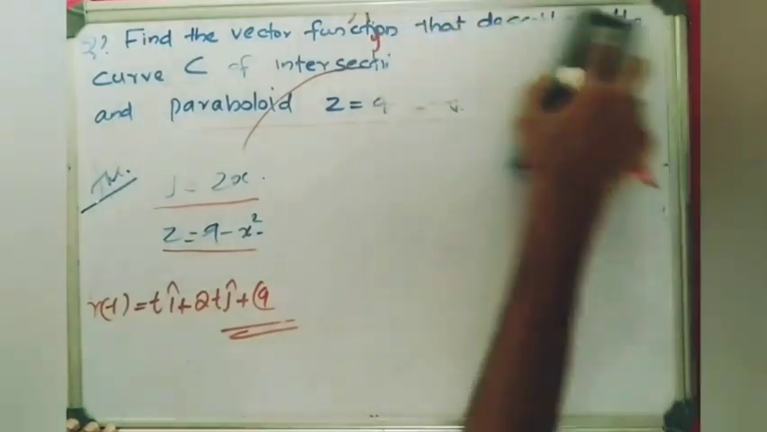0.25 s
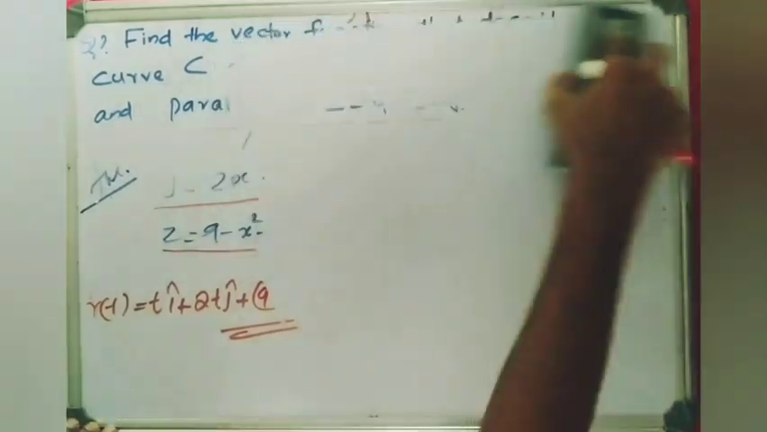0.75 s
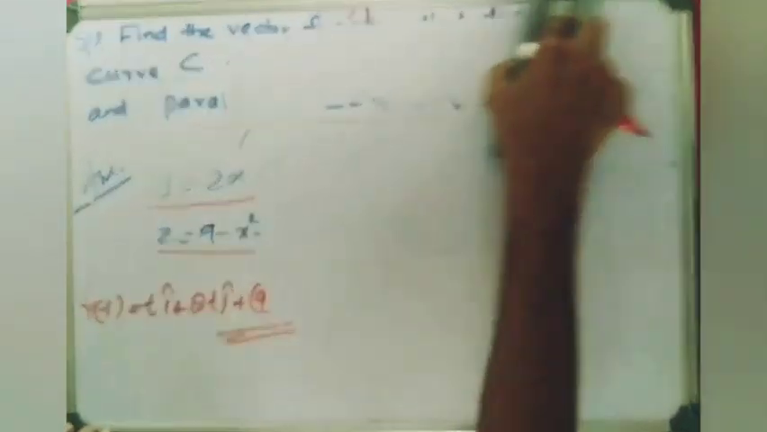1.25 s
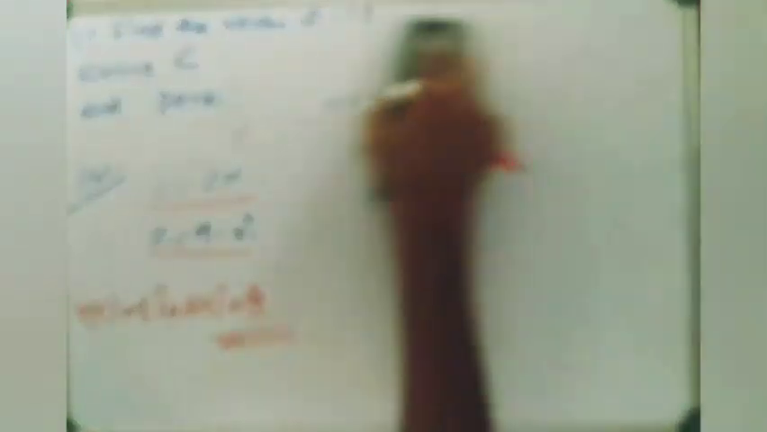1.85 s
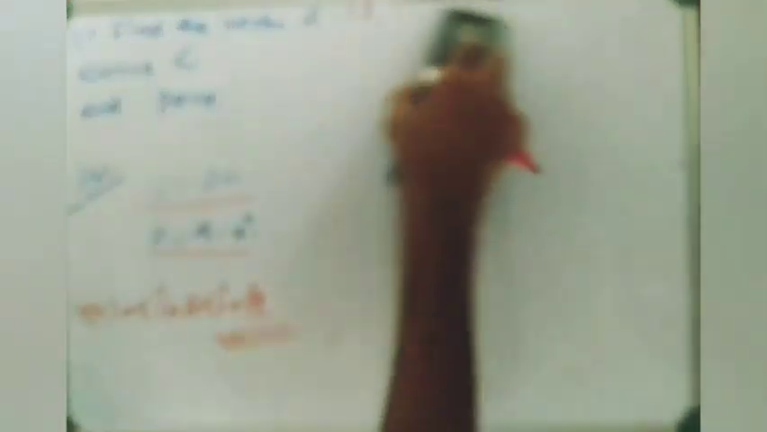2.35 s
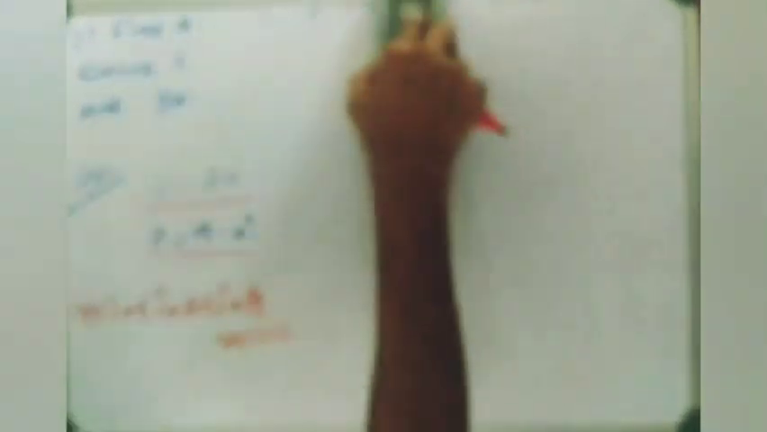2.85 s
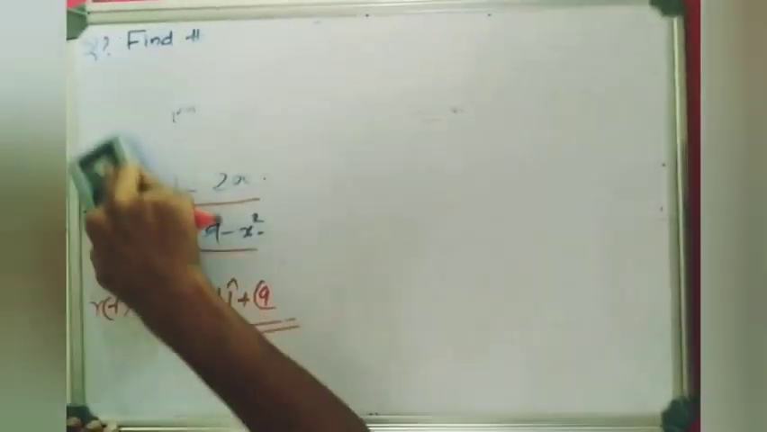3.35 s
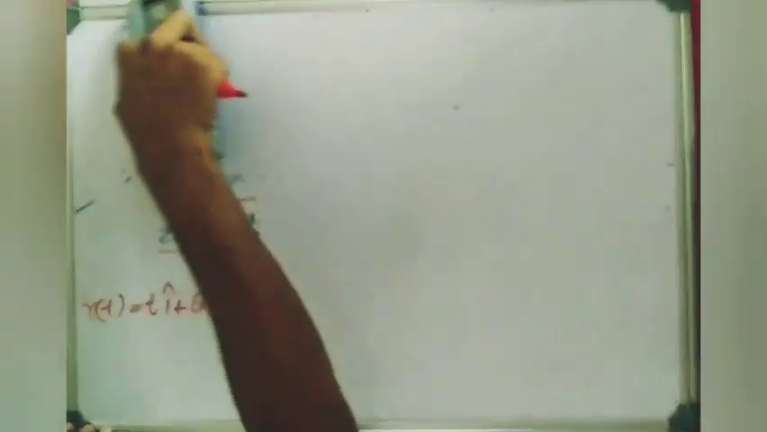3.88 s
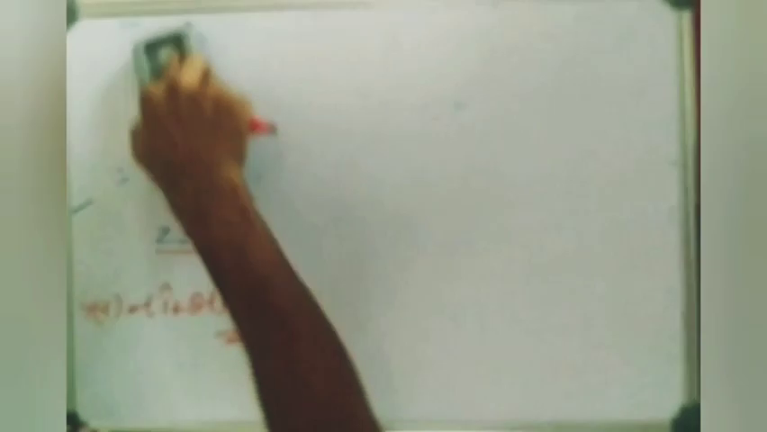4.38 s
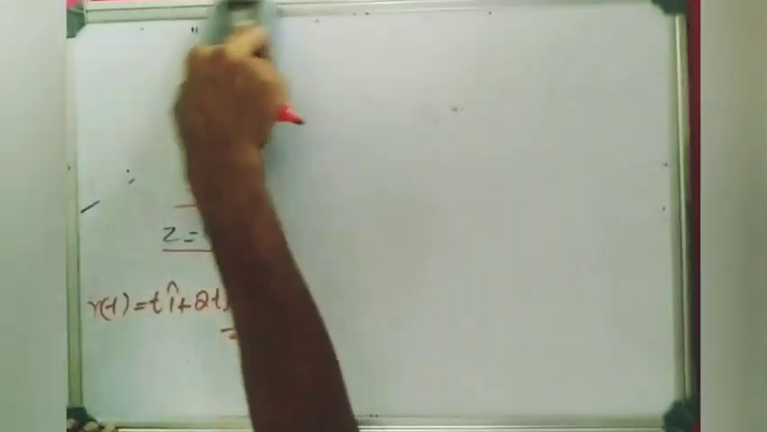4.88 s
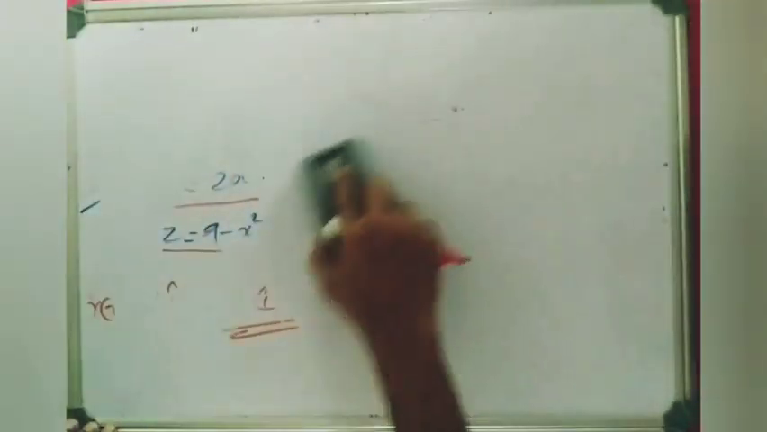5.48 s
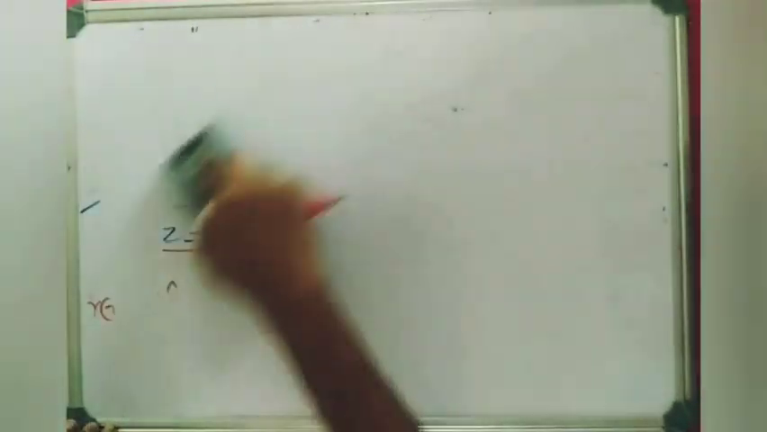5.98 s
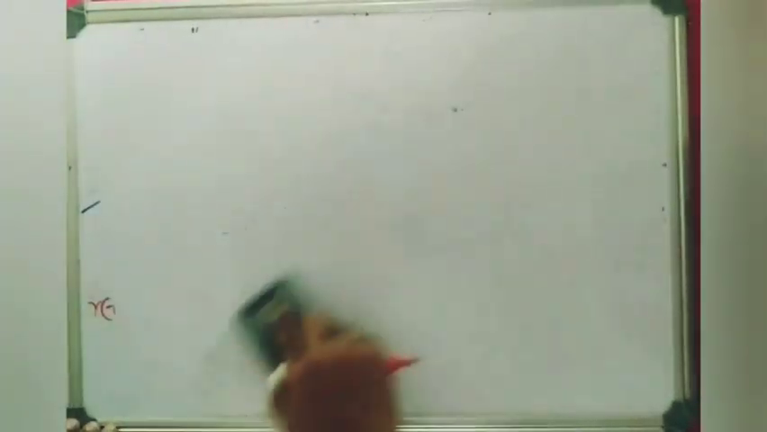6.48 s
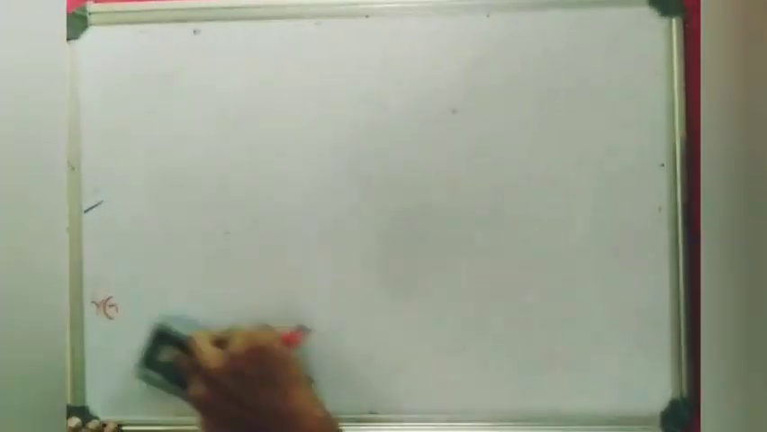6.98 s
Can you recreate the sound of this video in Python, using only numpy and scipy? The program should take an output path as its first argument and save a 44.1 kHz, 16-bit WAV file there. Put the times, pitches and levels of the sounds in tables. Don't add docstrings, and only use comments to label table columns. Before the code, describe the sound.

Soft, dry, breathy rubbing of felt on enamel, dipping at every change of direction. Behind it are a low engine drone sinking in pitch, dull street rumble through the walls, faint hiss and a very high sliding whine. Early knocks are sparse and faint; later strokes hit the panel with hollow thumps, gritty edge catches, small groans and two brief scrapes by the hard back. Close microphone, quiet small room.

```python
import sys
import numpy as np
from scipy import signal
from scipy.io import wavfile
from scipy.ndimage import uniform_filter1d

SR = 44100
rng = np.random.default_rng(int(sys.argv[2]) if len(sys.argv) > 2 else 0)


def makeup_ratio(level_db):
    decades = np.asarray(level_db, float) / 20
    return 10 ** decades


def put_to_file(sound):
    columns = np.atleast_2d(sound).T
    safe = np.clip(columns, -1, 1)
    whole_steps = np.round(safe * 32767)
    wavfile.write(sys.argv[1], SR, whole_steps.astype(np.int16))


N = 318828

# turn_s, turn_level_db, full_speed_level_db, full_speed_at_share (0-1 of the stroke)
STROKES = [(-.05, -59, -54.5, 0.4), (.22, -59, -51.5, 0.74), (.54, -59.5, -54.5, 0.41),
           (.91, -60.5, -53.5, 0.25), (1.051, -63, -53.5, 0.42), (1.185, -61, -54, 0.37),
           (1.51, -58.5, -55, 0.5), (1.73, -61, -53.5, 0.5), (2.09, -59.5, -56, 0.43),
           (2.33, -62, -52.5, 0.75), (2.68, -63, -53, 0.48), (2.92, -60, -53, 0.72), (3.25, -60.5, -55, 0),
           (3.46, -62, -57.5, 0.46), (3.721, -65.5, -54, 0.56), (3.85, -55, -55, 0.83),
           (4.13, -61.5, -57, 0.46), (4.31, -62.5, -54.5, 0.8), (4.61, -66.5, -52, 0.56),
           (4.851, -63, -54.5, .5), (5.04, -58.5, -54.5, 0.95), (5.25, -63.5, -52, 0.41),
           (5.46, -61, -53.5, 0.5), (5.7, -61, -53.5, 0.57), (5.94, -59, -52.5, 0.43), (6.2, -59, -55, 0.7),
           (6.439, -59.5, -54.5, 0.44), (6.82, -61, -55.5, 0.4), (7.05, -59.5, -56.5, 0.7)]
# pitch_hz, density_db (per Hz)
FELT_COLOUR = [(590, -44), (1000, -30), (1470, -8.5), (1570, -18), (1900, -6), (2930, -2.5), (3490, -3.5),
               (9000, -3), (11700, -7), (19800, -120)]
# time_s, brightness_db
PAD_TILT = [
    (0, -8),
    (.7, -3),
    (1.6, -3),
    (2.4, -3.5),
    (3.1, -3.5),
    (3.9, -1),
    (4.7, -0.5),
    (5.6, -5),
    (7.23, -0.5),
]

# time_s, speed_hz (cycles per second)
ENGINE_SPEED = [(0.0, 24.62), (0.7, 24.67), (1.4, 24.6), (1.9, 24.1), (2.2, 23.74), (2.8, 23.58),
                (3.4, 22.86), (4.0, 22.13), (4.6, 21.46), (5.2, 20.75), (5.8, 20.05), (6.4, 19.65),
                (7.23, 19.47)]
# time_s, load (0-1)
ENGINE_LOAD = [
    (0, 0.92),
    (1.2, 0.78),
    (1.4, 0.97),
    (1.88, 0.94),
    (2.05, 0.32),
    (5.6, 0.4),
    (5.9, 0.58),
    (7.23, 0.1),
]
# time_s, level_db
EXHAUST = [(0, -0.5), (.45, 5), (.7, -1), (.9, 4), (1.55, 0.5), (1.95, -0.5), (2.15, 8.5), (2.66, 7.5),
           (2.73, 1), (3.55, 3.5), (3.75, 6.5), (4.25, 9.5), (4.7, 3), (5.3, 5), (5.9, 2), (6.42, 4),
           (6.56, -11), (7.23, -11)]
# order (count), coasting_db, loaded_db, exhaust_share (of the exhaust level followed)
LOW_ORDERS = [(3, -42.5, -81, 0.67), (4, -55.5, -54.5, 1.44), (5, -54.5, -63.5, 0.68),
              (6, -61.5, -57.5, 0.3)]
# order (count), level_db, full_load_extra_db
UPPER_ORDERS = [(7, -64, 1), (8, -65, 4), (9, -65, -6), (10, -74, -2), (11, -75, 7), (12, -72, 8),
                (13, -68, 0), (14, -77, 6), (16, -78, 4), (18, -80, 8)]
# pitch_hz, gain_db
ROOM_BASS = [(58, -8), (66, 0.5), (76, -3), (88, -1.5), (98, 2), (108, -1.5), (118, -9), (130, -12.5),
             (142, 1)]

# pitch_hz, width_hz, level_db
ROOM_MODES = [(25, 6, -9), (36, 3, 0), (43, 3, -1)]
# peak_s, level_db, half_length_s
TRAFFIC_SWELLS = [(0, -43, 0.23), (0.486, -49.5, .06), (0.683, -46, 0.043), (0.896, -51, 0.077),
                  (1.268, -47, 0.12), (1.57, -44.5, 0.11), (1.9, -47.5, 0.22), (2.65, -51, 0.096),
                  (2.91, -43.5, 0.038), (3.11, -47.5, 0.052), (3.336, -42, 0.032), (3.725, -44, 0.15),
                  (4.197, -62, 0.31), (4.65, -51, 0.35), (4.976, -46.5, 0.14), (5.737, -48.5, 0.24),
                  (6.282, -48, 0.066), (6.795, -52.5, 0.3)]
# pitch_hz, density_db (per Hz)
STREET_COLOUR = [(30, -14), (55, -23), (75, -1.5), (120, -5), (160, -14), (243, -16.5), (351, -18.5),
                 (700, -25), (1300, -30.5), (2000, -37)]
# pitch_hz, left_minus_right_db
STREET_LEAN = [(60, -5), (110, 7.5), (200, -2.5), (380, -0.5), (700, 2.2), (1290, -3), (2380, 3), (4400, 6)]
# pitch_hz, density_db (per Hz)
HISS_COLOUR = [(300, -14.5), (700, -6.5), (1500, -8.5), (2500, -9), (5000, -29.5), (9100, -15), (9900, 3.5),
               (10450, -3.5), (10900, -14), (13000, -19), (16000, -33)]
# pitch_hz, likeness (0-1)
PORT_LIKENESS = [(60, .98), (130, .95), (290, .9), (640, .35), (1410, 0), (3100, .05), (6820, .05),
                 (15000, .04)]

WHINE_SLIDES = [-.09, .37, .85, 1.32, 1.93, 2.39, 2.81, 3.34, 3.97, 4.46, 4.84, 5.38, 5.78, 6.23, 6.78, 7.3]
# pitch_hz, left_db, right_db
WHINE_PEAKS = [(9580, -6, -7), (9660, -6, -5), (9730, -1, 0), (9790, -2, -3), (9850, -2, 0), (9920, -3, -2),
               (9975, 2, -2), (10055, -3, -4), (10116, -3, 0), (10200, -10, -9), (10290, -10, -9),
               (10440, -9, -10)]
# peak_s, pitch_hz, level_db, left_minus_right_db
WHINE_FLARES = [(0.16, 9730, -59, -6), (0.31, 9579, -58, 1), (0.45, 9866, -59, -9), (0.63, 9755, -61, 0),
                (0.88, 9877, -60, -3), (0.91, 9759, -60, -11), (1.86, 9934, -59, -2), (1.97, 9880, -59, -6),
                (2.0, 9800, -57, 2), (2.11, 9667, -62, -2), (2.56, 9874, -58, -3), (2.66, 9690, -59, 4),
                (3.06, 9725, -61, 3), (3.17, 10021, -60, -4), (3.21, 9663, -62, 0), (3.29, 9972, -58, 1),
                (3.49, 9797, -60, -6), (3.56, 9728, -57, -3), (3.69, 9633, -62, -1), (3.86, 9791, -60, 1),
                (3.87, 9977, -57, 2), (3.9, 9879, -58, -2), (4.06, 9838, -57, -2), (4.18, 9717, -59, 0),
                (4.22, 10020, -61, -3), (4.35, 9977, -58, 6), (4.49, 9880, -59, -4), (4.52, 10138, -61, -1),
                (4.57, 9837, -59, 2), (4.79, 9967, -57, 3), (5.03, 10140, -60, -3), (5.05, 9974, -60, 3),
                (5.08, 9719, -60, -2), (5.39, 10055, -57, 2), (5.54, 9715, -61, 0), (5.79, 10061, -57, 1),
                (5.82, 9861, -60, -4), (6.01, 9730, -57, -1), (6.12, 9521, -62, -4), (6.14, 9971, -57, 4),
                (6.26, 10084, -59, 1), (6.28, 9856, -59, -7), (6.4, 9770, -55, 0), (6.52, 9604, -58, -2),
                (6.61, 9984, -58, -2), (6.73, 9855, -58, -10), (6.75, 10113, -58, -4), (6.86, 9838, -56, 4),
                (6.91, 9739, -60, 1), (7.18, 9877, -61, 1)]

# start_s, peak_db, loudest_hz, t60_s, contact_tick_db
KNOCKS = [(0.175, -61, 315, 0.2, -2), (0.809, -52, 362, 0.18, -16), (1.501, -56, 304, 0.28, -9),
          (1.749, -51, 280, 0.22, -13), (3.289, -50, 493, 0.11, -9), (3.767, -48.5, 286, 0.17, -3.5),
          (3.851, -48.5, 656, 0.093, -23), (4.326, -58, 380, 0.25, -17), (4.661, -60, 320, 0.17, -15),
          (4.894, -51, 437, 0.15, -14), (5.023, -44.5, 556, 0.063, -17), (5.16, -52, 285, 0.2, -28),
          (5.306, -48, 550, 0.08, -20), (5.463, -42, 695, 0.087, -19), (5.668, -46.5, 511, 0.068, -20),
          (5.822, -49, 330, 0.17, -16), (5.927, -43.5, 490, 0.11, -8), (6.35, -62, 288, 0.16, -25),
          (6.757, -44, 320, 0.12, -22), (6.821, -38.5, 280, 0.11, -12.5), (6.824, -40.5, 446, 0.094, -14)]
# pitch_hz, level_db, decay_share (of the knock's t60)
PANEL_MODES = [(297, 6, 0.75), (402, 13, 1), (460, 5, 0.42), (600, -9, 0.39), (624, 2, 0.92),
               (905, -5, 0.5), (1104, -16, 1), (1946, -6, 0.58)]
# start_s, peak_db, centre_hz, t60_s
SCUFFS = [(0.9162, -47, 1920, 0.093), (1.9184, -44, 2850, 0.088), (3.774, -38, 4760, 0.066),
          (3.838, -41, 3680, 0.086), (4.0701, -36.5, 4610, 0.049), (5.219, -50, 2820, 0.13),
          (5.726, -41.5, 2050, 0.064), (6.016, -39, 2800, 0.054), (6.58, -47.5, 2360, 0.29),
          (6.661, -43.5, 3420, 0.095), (6.73, -49.5, 1950, 0.19), (6.824, -41.5, 1950, 0.048),
          (6.823, -44, 880, 0.057)]
# start_s, length_s, pitch_hz, level_db
GROANS = [(3.761, 0.11, 330, -61), (3.976, 0.034, 330, -62), (4.319, .1, 368, -65),
          (4.553, 0.071, 396, -67), (4.668, .08, 325, -63), (4.888, 0.089, 420, -61.5),
          (5.122, 0.081, 410, -62), (5.322, 0.076, 380, -63), (5.526, 0.068, 310, -64),
          (5.745, .1, 350, -61), (5.949, 0.12, 300, -63), (6.284, 0.11, 350, -62),
          (6.582, 0.068, 312, -62.5), (7.152, 0.078, 365, -67)]

# start_s, attack_s, hold_s, release_s
HIGH_DRAG = (4.375, .08, .2, .06)
LOW_DRAG = (6.57, .1, .42, .12)
# pitch_hz, width_hz, level_db
HIGH_DRAG_MODES = [(1000, 230, -5.5), (1490, 260, -0.5), (1585, 100, -12), (1890, 180, 2.5),
                   (2020, 110, -2), (2230, 500, -2)]
LOW_DRAG_MODES = [(330, 130, -9), (541, 63, -4), (619, 83, 3), (717, 140, 1), (776, 670, 3.5),
                  (1099, 27, -2.5), (1570, 300, -4.5), (1950, 81, -6)]
HIGH_DRAG_BEND = (-.07, 0)
LOW_DRAG_BEND = (-.02, .04)

# pitch_hz, threshold_db (against the band's usual level)
FAINT_BANDS = [(1000, -6.3), (1700, -4), (3000, -3.2), (4500, -2.5), (9000, -3.2), (10000, -8),
               (10450, -4.5), (10800, 1), (11300, 1), (12000, 0), (12700, -1), (15300, -1), (15600, .8)]


def evened(x):
    return x / np.sqrt(np.mean(x ** 2) + 1e-20)


def curve(rows, column=1, t=None):
    rows = np.array(rows)
    return np.interp(np.arange(N) / SR if t is None else t, rows[:, 0], rows[:, column])


def read(points, hz):
    f, value = np.transpose(points)
    return np.interp(np.log(hz + 1), np.log(f + 1), value)


def add(mix, s, sound):
    part = mix[..., round(s * SR):][..., :sound.shape[-1]]
    part += sound[..., :part.shape[-1]]


def resonate(x, hz, width):
    turn = np.exp(2j * np.pi * np.cumsum(hz * np.ones(x.shape[-1])) / SR)
    r = np.exp(-np.pi * width / SR)
    return 2 * (turn * signal.lfilter([1 - r], [1, -r], x / turn)).real


def resonate_twice(x, hz, width):
    return resonate(resonate(x, hz, width), hz, width)


def wander(rate_hz):
    t = np.arange(0, N, 64) / SR
    rates = np.geomspace(rate_hz / 10, rate_hz, 20)
    slow = sum(np.sin(2 * np.pi * (f * t + rng.random())) / np.sqrt(f) for f in rates)
    return np.interp(np.arange(N) / SR, t, evened(slow))


def noise(colour_db, size, patchy_db, flicker_db):
    hop = size // 4
    frames, hz = N // hop + 5, np.fft.rfftfreq(size, 1 / SR)[:, None]
    a, b, c, d, patches = rng.standard_normal((frames, len(hz), 5)).T
    patches = uniform_filter1d(patches, size // 64, 0)
    patches = evened(uniform_filter1d(patches, 4096 // hop, 1))
    flicker = evened(uniform_filter1d(rng.standard_normal(frames), 3))
    same = np.clip(read(PORT_LIKENESS, hz), -1, 1)
    left = a + 1j * b
    right = same * left + np.sqrt(1 - same ** 2) * (c + 1j * d)
    shape_db = colour_db(hz, np.arange(frames) * hop / SR)
    z = np.array([left, right]) * makeup_ratio(shape_db + patchy_db * patches + flicker_db * flicker)
    return evened(signal.istft(z, nperseg=size, noverlap=size - hop)[1][:, :N])


def strokes(t):
    last_stroke_s, fullness = 0.44, 0.68
    start, turn_db, peak_db, share = np.transpose(STROKES)
    turns = np.append(start, start[-1] + last_stroke_s)
    k = np.clip(np.searchsorted(turns, t) - 1, 0, len(start) - 1)
    u = np.clip((t - turns[k]) / np.diff(turns)[k], 0, 1)
    at = np.clip(share[k], .05, .95)
    speed = np.sin(np.pi / 2 * np.minimum(u / at, (1 - u) / (1 - at))) ** fullness
    next_turn_db = np.append(turn_db[1:], turn_db[-1])
    rest_db = np.where(u < at, turn_db[k], next_turn_db[k])
    return rest_db + (peak_db[k] - rest_db) * speed


def felt():
    def colour(hz, t):
        harder_db = strokes(t) + 56
        bright = np.clip((hz - 3000) / 3500, 0, 1) * (curve(PAD_TILT, t=t) + 0.1 * harder_db - 2.0)
        top = np.clip((hz - 9000) / 2000, 0, 1) * (-0.25 * harder_db - 3)
        bass_cut = 9 * np.log2(np.maximum(1500 / (hz + 1), 1))
        return read(FELT_COLOUR, np.minimum(hz, 9000)) - bass_cut + 0.44 * bright + top
    slips = np.minimum(rng.exponential(1, N // 40 + 1), 5)
    grit = makeup_ratio(0.47 * slips).repeat(40)[:N]
    rub = noise(colour, size=256, patchy_db=1.23, flicker_db=0.0)
    return makeup_ratio(strokes(np.arange(N) / SR) + 5.0) * evened(rub * grit)


def engine():
    speed, load = curve(ENGINE_SPEED), curve(ENGINE_LOAD)
    turns = 2 * np.pi * np.cumsum(speed * (1 + .002 * wander(6))) / SR

    def order(k, level_db):
        return makeup_ratio(level_db) * np.sin(k * turns + 2 * np.pi * rng.random())

    low = 0
    for k, (_, coast_db, load_db, share) in enumerate(LOW_ORDERS, start=3):
        level_db = share * curve(EXHAUST) + coast_db + (load_db - coast_db) * load
        uneven_db = 0.7 * wander(10) + 1.0 * wander(30)
        low = low + order(k, level_db + read(ROOM_BASS, k * speed) + uneven_db)
    coasting_db, loaded_db = -13.5, 1.5
    load_gain_db = coasting_db + (loaded_db - coasting_db) * load
    full_load = np.clip((load - .87) * 10, 0, 1)
    upper = sum(order(k, db + load_gain_db + full_db * full_load + 2.0 * wander(2.59))
                for k, db, full_db in UPPER_ORDERS)
    return np.sqrt(2) * (low + upper) * makeup_ratio([[.9], [-.9]])


def rumble():
    air = rng.standard_normal(N)
    booms = sum(makeup_ratio(db) * evened(resonate_twice(air, hz, width)) for hz, width, db in ROOM_MODES)
    level = np.sqrt(uniform_filter1d(booms ** 2, 12000) + 0.012 * np.mean(booms ** 2))
    t, lull_db = np.arange(N) / SR, -56
    swells = sum(makeup_ratio(db) ** 2 * np.exp(-((t - s) / half) ** 2) for s, db, half in TRAFFIC_SWELLS)
    return np.sqrt(makeup_ratio(lull_db) ** 2 + swells) * booms / level * makeup_ratio([[.3], [-.3]])


def wash():
    def colour(hz, t):
        lean = read(STREET_LEAN, hz) * np.array([.5, -.5])[:, None, None]
        wall_loss = 8 * np.log2(np.maximum(hz / 1200, 1))
        roar = 5 * (curve(ENGINE_LOAD, t=t) - .8) * np.exp(-np.log2((hz + 1) / 215) ** 2 / 0.21)
        return read(STREET_COLOUR, hz) + lean - wall_loss + roar
    level_db, fade_db_per_s = -51, 0.85
    level = makeup_ratio(level_db - fade_db_per_s * np.arange(N) / SR)
    return level * noise(colour, size=2048, patchy_db=.9, flicker_db=.3)


def hiss():
    return makeup_ratio(-57) * noise(lambda hz, t: read(HISS_COLOUR, hz), size=512, patchy_db=1.2, flicker_db=.2)


def whine():
    slope_hz_per_s, grows_db_per_s = -760, .15
    t, out = np.arange(-2600, 2600) / SR, np.zeros((2, N + 2 * SR))
    slides = [(s, -64) for s in WHINE_SLIDES]
    slides += [(s + .2, -64.5) for s in WHINE_SLIDES]
    chances = np.clip(rng.standard_normal((len(slides), len(WHINE_PEAKS), 6)), -1.3, 1.3)
    for (s, db), chance in zip(slides, chances):
        for (hz, l_db, r_db), (both, l, r, off, late, turn) in zip(WHINE_PEAKS, chance):
            cycles = (hz + 7 * off) * t + .3 * slope_hz_per_s * t ** 2 / 2
            luck_db = db + grows_db_per_s * s + 1.3 * both + 1.8 * np.array([[l], [r]])
            flare = makeup_ratio(3.5 + luck_db + np.array([[l_db], [r_db]])) * np.hanning(len(t)) ** .5
            start = 1 + s + (hz - 9900) / slope_hz_per_s + t[0] + 0.023 * late
            add(out, max(start, 0), flare * np.sin(2 * np.pi * (cycles + [[0], [turn]])))
    return out[:, SR:SR + N]


def drone():
    t = np.arange(N) / SR
    level_db = -76 + 1.2 * t + 2.5 * wander(3)
    pitch_hz = 197 * (1 + 0.0116 * wander(2.5))
    return makeup_ratio(level_db) * np.sin(2 * np.pi * np.cumsum(pitch_hz) / SR)


def flares():
    length_s, sag_hz_per_s, trim_db = .15, -120, -2.5
    t, out = np.arange(-.12, .12, 1 / SR), np.zeros((2, N + SR))
    shape = np.cos(np.pi * np.clip(t / length_s, -.5, .5))
    for (s, hz, db, lean_db), turn in zip(WHINE_FLARES, rng.random(len(WHINE_FLARES))):
        cycles = hz * t + sag_hz_per_s * t ** 2 / 2 + np.array([[0], [turn]])
        level = makeup_ratio(db + trim_db + np.array([[.5], [-.5]]) * lean_db)
        add(out, .5 + s + t[0], level * shape * np.sqrt(2) * np.sin(2 * np.pi * cycles))
    return out[:, SR // 2:SR // 2 + N]


def knock(db, blow_hz, t60, tick_db, chance, grit):
    t = np.arange(grit.shape[1]) / SR
    ring = 0
    for (hz, mode_db, share), (u, v) in zip(PANEL_MODES, chance):
        level_db = mode_db - 9.7 * np.log2(hz / blow_hz) ** 2 - 60 * t / (share * t60)
        phase = v * np.array([[0], [hz / 1500]])
        ring = ring + makeup_ratio(level_db) * np.sin(2 * np.pi * (hz * (0.8 + 0.207 * u) * t + phase))
    tick = makeup_ratio(tick_db + 3.5 - 60 * t / 0.15) * evened(resonate(grit, 710, 800))
    body = resonate_twice(grit[0] + 0.077 * grit, blow_hz, 0.89 * blow_hz)
    thud = makeup_ratio(-4.5 - 60 * t / (1.72 * t60)) * evened(body)
    return makeup_ratio(db - 4.0) * (1.2 * ring / abs(ring).max() + thud + tick) * (1 - np.exp(-t / 0.0011))


def scuff(db, hz, t60, grit):
    t = np.arange(grit.shape[1]) / SR
    return makeup_ratio(db - 2.0 - 60 * t / t60) * (1 - np.exp(-t / 0.003)) * evened(resonate(grit, hz, 0.73 * hz))


def groan(length, hz, db, grit):
    u = np.arange(round(length * 2 * SR)) / (length * SR)
    moan = resonate_twice(grit[0] + 0.14 * grit, hz, 80)[:, 1000:1000 + len(u)]
    return makeup_ratio(db) * evened(moan) * np.minimum(u / 0.091, 1) * np.cos(np.pi / 4 * u) ** 2


def drag(start, attack, hold, release, db, modes, bend, sag_db_per_s):
    t = np.arange(0, attack + hold + release, 1 / SR)
    one, other = rng.standard_normal((SR, 2))[:len(t)].T
    slips = np.array([one, 0.19 * one + 0.99 * other])
    u = t / t[-1]
    pitch = 1 + bend[0] * (u - .5) + bend[1] * (np.sin(np.pi * np.sqrt(u)) - 2 / 3)
    ring = 0
    for (hz, width, mode_db), chance in zip(modes, rng.standard_normal((len(modes), 32000))):
        slow = uniform_filter1d(uniform_filter1d(chance, size=1200), size=1200)
        breaks_db = 1.6 * evened(slow)[:len(t)]
        ring = ring + makeup_ratio(mode_db + breaks_db) * evened(resonate_twice(slips, hz * pitch, width))
    edges = np.clip(np.maximum(1 - t / attack, (t - attack - hold) / release), 0, 1)
    shape_db = -15 * edges - sag_db_per_s * np.clip(t - attack, 0, hold)
    return start, makeup_ratio(db + shape_db) * evened(ring) * signal.windows.tukey(len(t), .15)


def scene():
    mix = felt() + engine() + rumble() + wash() + hiss() + whine() + drone() + flares()
    chances = rng.random((len(KNOCKS), len(PANEL_MODES), 2))
    for (s, *blow), chance, grit in zip(KNOCKS, chances, rng.standard_normal((len(KNOCKS), 2, 9000))):
        add(mix, s, knock(*blow, chance, grit))
    for (s, *catch), grit in zip(SCUFFS, rng.standard_normal((len(SCUFFS), 2, 5000))):
        add(mix, s, scuff(*catch, grit))
    for (s, *moan), grit in zip(GROANS, rng.standard_normal((len(GROANS), 2, 16000))):
        add(mix, s, groan(*moan, grit))
    add(mix, *drag(*HIGH_DRAG, db=-54, modes=HIGH_DRAG_MODES, bend=HIGH_DRAG_BEND, sag_db_per_s=29))
    add(mix, *drag(*LOW_DRAG, db=-51.5, modes=LOW_DRAG_MODES, bend=LOW_DRAG_BEND, sag_db_per_s=25))
    return mix


def mute(x):
    hz, t, z = signal.stft(x, SR, nperseg=2048, noverlap=1536)
    power = (abs(z) ** 2).sum(0)
    fine = uniform_filter1d(uniform_filter1d(power, size=3, axis=0), size=5, axis=1)
    band = uniform_filter1d(fine, size=15, axis=0)
    under_db = 10 * np.log10(band / band.mean(1, keepdims=True))
    draw = uniform_filter1d(rng.standard_normal(band.shape), size=3, axis=1)[:, ::3]
    draw = evened(draw).repeat(3, axis=1)[:, :len(t)]
    narrow, wide = (draw.repeat(bins, axis=0)[:len(hz)] for bins in (6, 10))
    luck = np.where(hz[:, None] < 9500, narrow, wide)
    keep = .4 * under_db + 3 * luck > read(FAINT_BANDS, hz)[:, None]
    gain = np.where(hz[:, None] > 800, np.maximum(keep, .02) * (fine / band) ** .4, 1)
    return signal.istft(z * gain, SR, nperseg=2048, noverlap=1536)[1][:, :N]


def band_limit(x):
    return signal.sosfilt(signal.butter(12, 15790, fs=SR, output="sos"), x)


def record(dry):
    bass_cut = signal.butter(2, 20, "high", fs=SR, output="sos")
    heard = mute(signal.sosfilt(bass_cut, dry))
    return band_limit(heard)


dry = scene()
out = record(dry)
put_to_file(out)
```